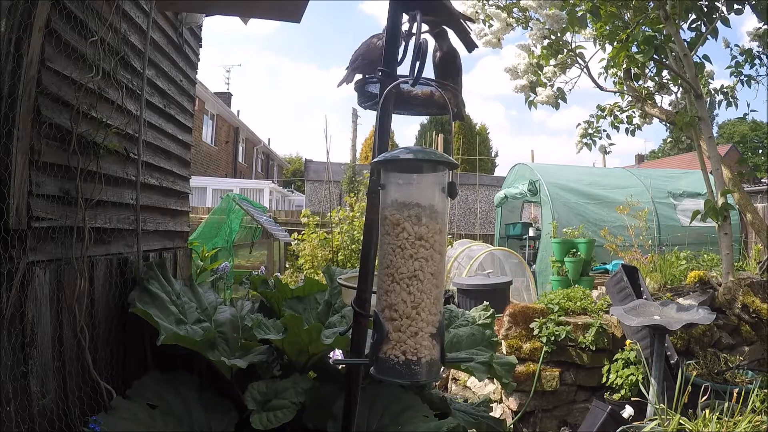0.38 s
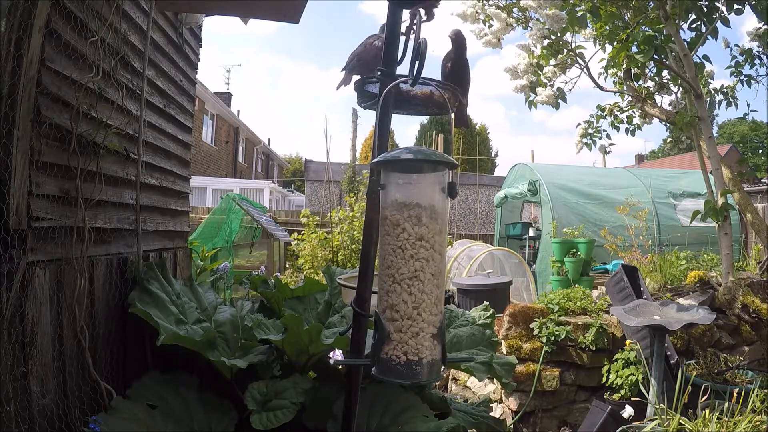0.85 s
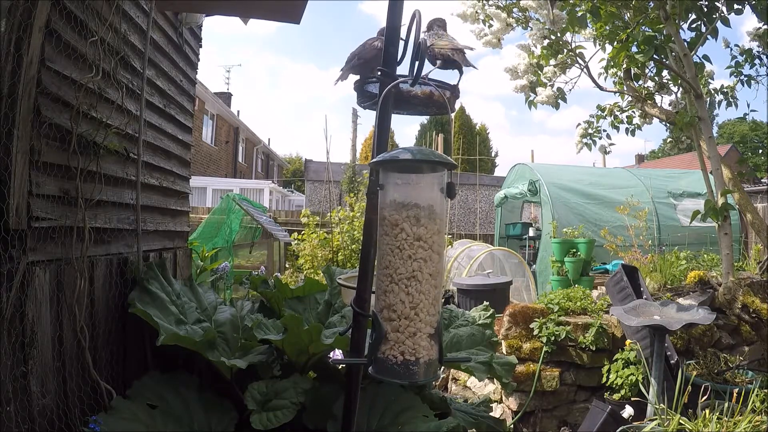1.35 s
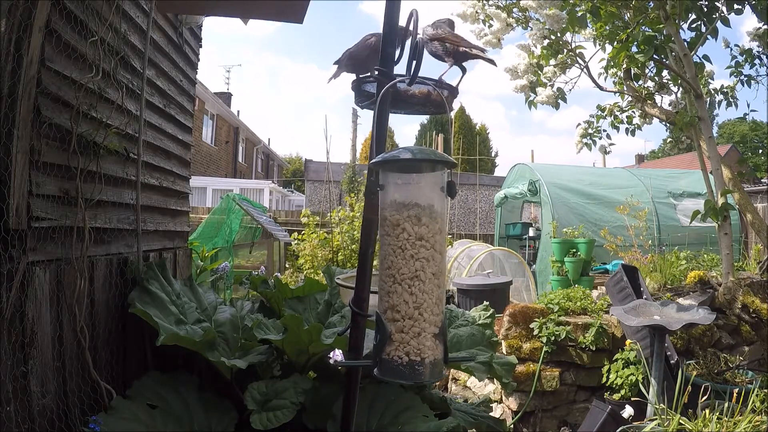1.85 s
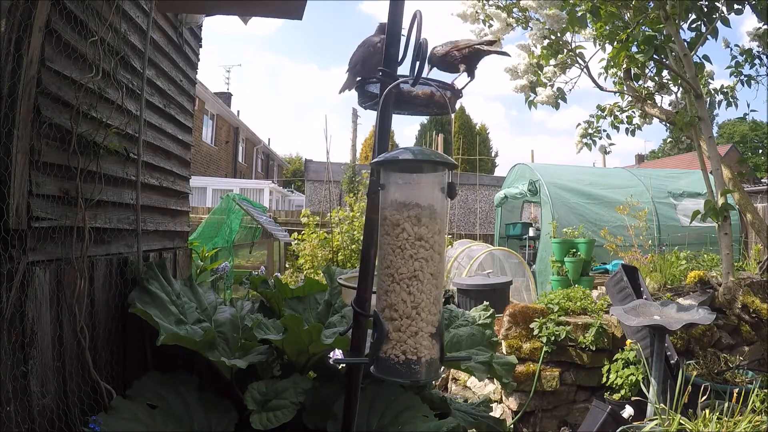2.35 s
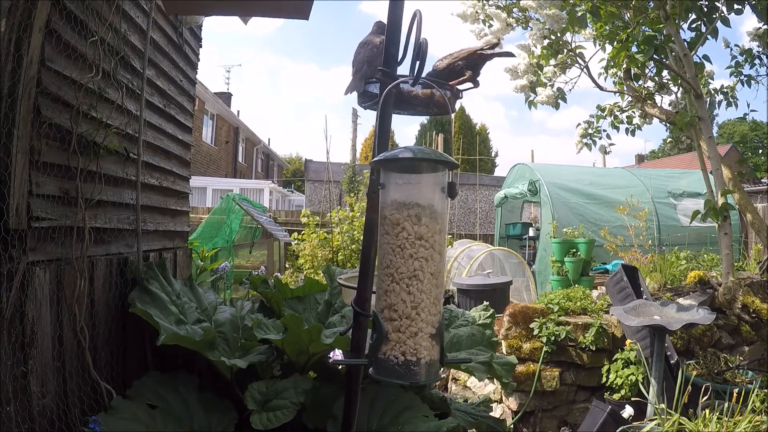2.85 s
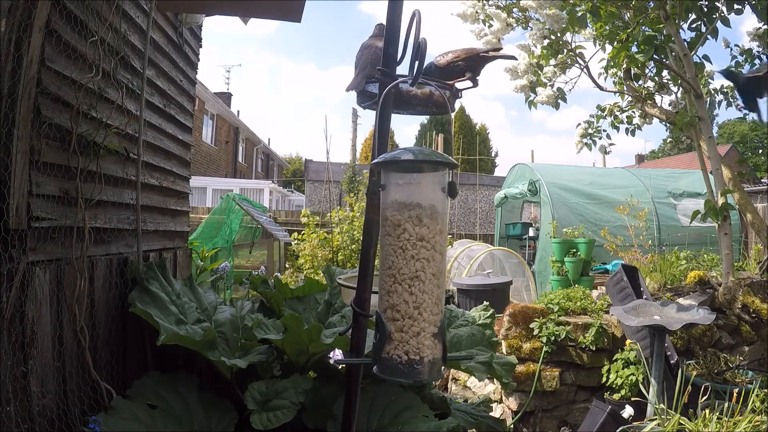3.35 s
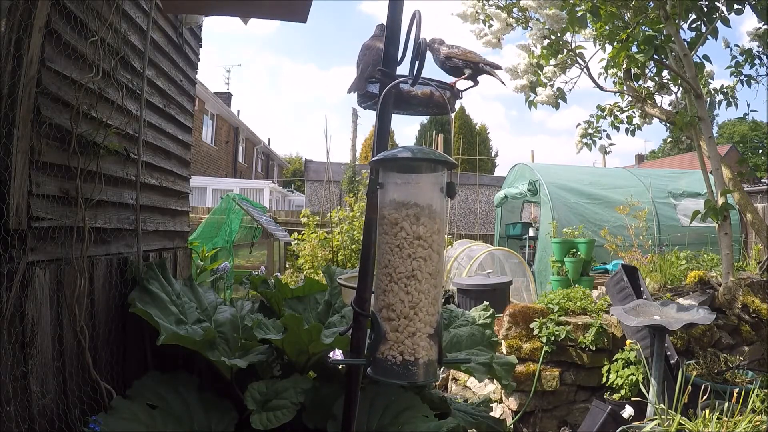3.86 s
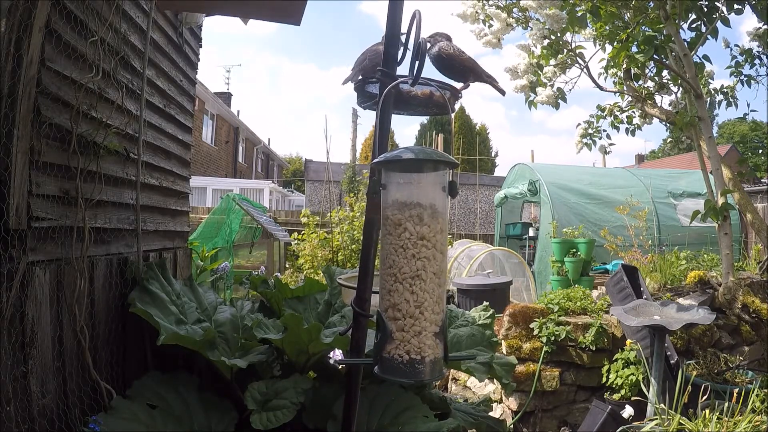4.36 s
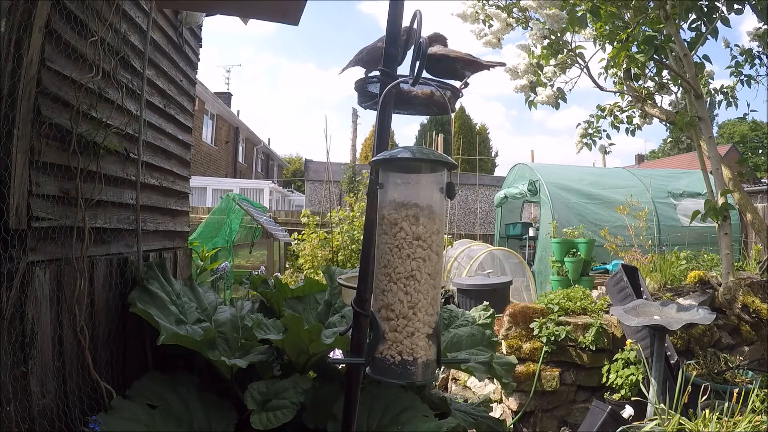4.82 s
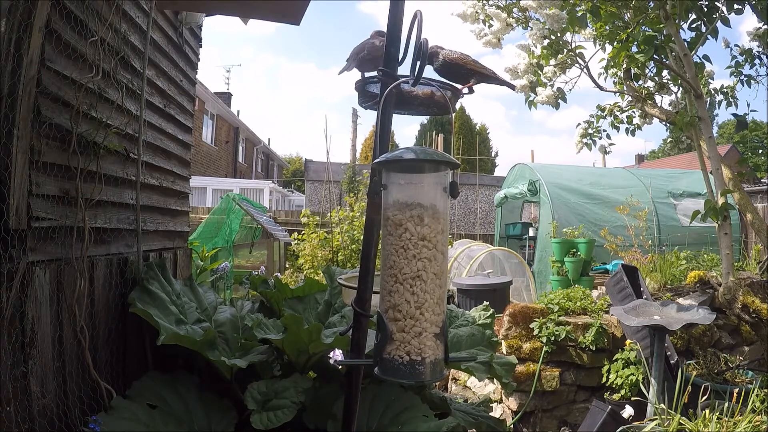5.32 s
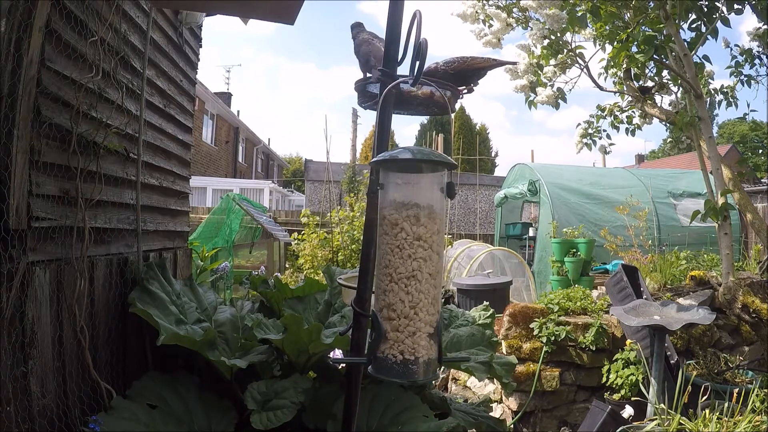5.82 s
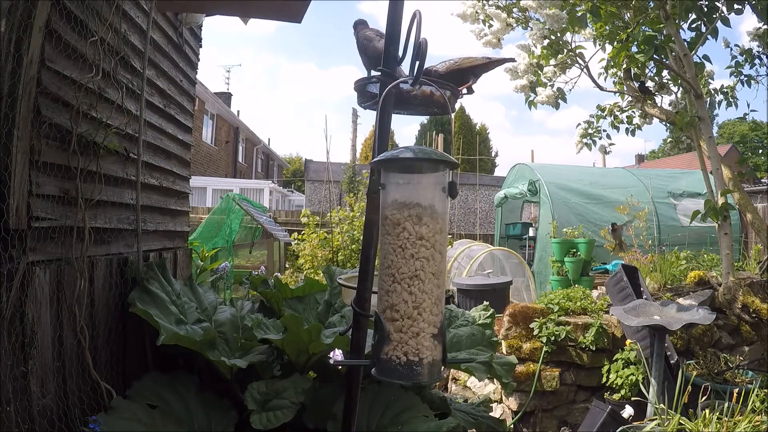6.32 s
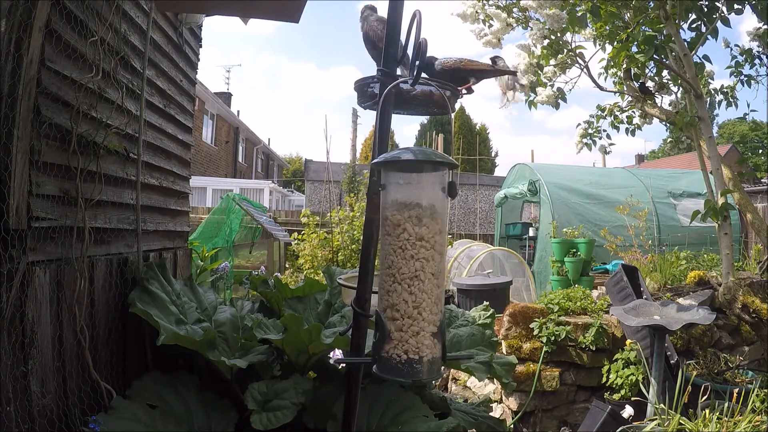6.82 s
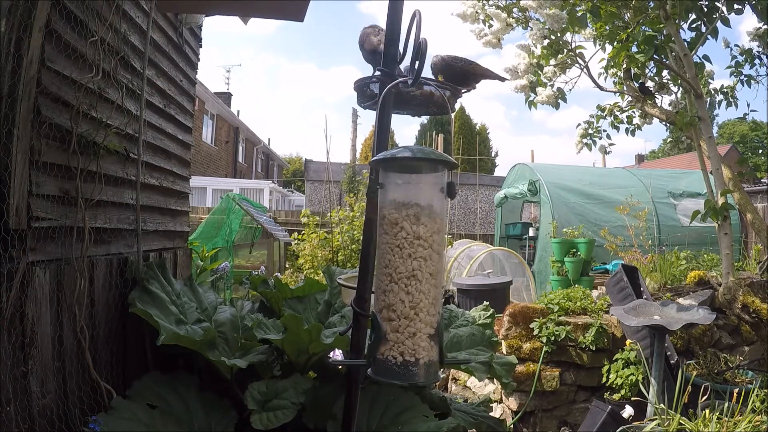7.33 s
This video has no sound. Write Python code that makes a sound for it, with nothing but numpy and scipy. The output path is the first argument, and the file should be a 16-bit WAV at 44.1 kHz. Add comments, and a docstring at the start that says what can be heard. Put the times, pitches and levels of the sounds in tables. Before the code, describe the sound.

A garden feeder heard close, with short dry reflections from shed and fence. A young starling's harsh begging churr, a fast rattling trill trembling about seventy times a second, is already sounding and stops at 0.4 s; another runs 0.9-1.5 s. Faint chirps come near 0.5 s and a tiny claw tick at 0.6. From 1.6 to 2.6 s short scratchy squawks tumble out rapidly, torn and bright. After a gap with a tick near 2.9, more squawks run 3.1-3.8 s, with soft wing flutter from 3.3 to about 3.9. Longer squawks at 4.0, 4.2 and 4.5 overlap a churr until 4.6. Then it is calmer: distant small-bird chirps around 5, 5.7, 6.5 and 7.1, two weak squawks and a very faint low coo just after 6. A last churr swells from 7.2 to the end. Wind rumbles low, bumping strongest around 2 and 3.7 s, over faint hush, slight drone and a barely audible high whine.

```python
"""A garden feeder beside a wooden shed, where young starlings beg in throbbing churrs and harsh squawks.
Churrs pair two trembling voices; squawks are torn pulses and air puffs ringing through throat and beak.
Small birds chirp and a low note coos further off as fluttering sines; claws tick as ringing clicks.
Wings puff shaped noise as a bird lands. Filtered noise makes the wind rumble on the microphone, a low drone
and the neighbourhood hush; the camera electronics whine faintly as a steady sine."""
import sys
import numpy as np
from scipy import signal
from scipy.fft import rfft, irfft
from scipy.io import wavfile

SR = 44100
rng = np.random.default_rng(int(sys.argv[2]) if len(sys.argv) > 2 else 0)


def linear_from_db(decibels):
    """Turn decibels (scalar or array-like) into linear amplitude factors; 0 gives 1."""
    return 10 ** (np.asarray(decibels, float) / 20)


def put_to_file(sound):
    """Save the sound as 16-bit audio at rate SR, in the file named by the first command-line argument."""
    columns = np.atleast_2d(sound).T  # one column per channel
    safe = np.clip(columns, -1, 1)
    whole_steps = np.round(safe * 32767)
    wavfile.write(sys.argv[1], SR, whole_steps.astype(np.int16))


N = 328104  # samples

# Source levels are set ahead of the yard's echoes; spectra give relative gains.
# wind gusts over time: time_s, level_db (a random flutter rides on it)
WIND_GUSTS = [(0.0, -54), (0.04, -48.5), (0.41, -55.5), (0.66, -49.5), (0.87, -51.5), (1.66, -46.5),
              (1.95, -54), (2.03, -40.5), (2.28, -50), (2.98, -56.5), (3.67, -33.5), (3.69, -38.5),
              (4.54, -55), (6.44, -54), (6.51, -48), (6.8, -57), (6.84, -51.5), (7.44, -57.5)]
# spectrum of the wind rumble: frequency_hz, gain_db
WIND_SPECTRUM = [(7.1, -37), (12, -2), (27, 5), (41, 1.5), (145, -23.5), (303, -31.5), (351, -37.5),
                 (400, -34.5), (520, -38), (880, -120)]
# swells of the low drone: centre_s, added_level_db, half_length_s
DRONE_SWELLS = [(1.92, -57, 0.093), (4.13, -57, 0.073), (5.75, -64, 0.057)]
DRONE_DB = -66.5  # between swells
# spectrum of the neighbourhood hush: frequency_hz, gain_db
HUSH_SPECTRUM = [(88, -33), (150, -3.5), (221, -6), (426, -8.5), (639, -12), (940, -12.5), (1680, -16),
                 (1920, -16), (2080, -14), (8030, -23), (8850, -22.5), (9560, -24.5), (15200, -26)]
HUSH_DB = -62
# camera whine: pitch_hz, level_db
CAMERA_WHINE = [(8629, -77)]

# one breakpoint table a churr: time_s, effort_db (raised by CHURR_LIFT_DB), upper_rest_pitch_hz
CHURR_CURVES = [
    [(0, -43, 3856), (.2, -46, 3644), (.3, -44, 3630), (.33, -43.5, 3426), (.405, -44.5, 3280),
     (.43, -62, 2800)],
    [(.905, -67, 3810), (.93, -50.5, 3800), (1.05, -44.5, 3763), (1.33, -41.5, 3785), (1.36, -44.5, 3655),
     (1.525, -41.5, 3236), (1.545, -50, 3020)],
    [(4.03, -53.5, 3693), (4.22, -41, 3976), (4.31, -41.5, 4097), (4.42, -39, 3785), (4.57, -38.5, 3750),
     (4.6, -53, 3280)],
    [(7.17, -66.5, 3610), (7.24, -65, 3690), (7.33, -54.5, 3690), (7.36, -46.5, 3720), (7.44, -46.5, 3740)],
]
CHURR_LIFT_DB = 6.0
# tremor of each churr: start_phase_turns, settled_rate_hz, extra_throbs (gained in the hurried start)
CHURR_THROBS = [(.56, 66, .3), (.74, 66, 2.04), (.51, 71.2, .5), (.83, 70.5, 1.72)]
HURRY_S = .17  # time constant of the hurried start
# lower voice of each churr: rest_pitch_hz, top_pitch_hz, swell_at_top_db
LOWER_VOICES = [(2100, 2780, -1), (2105, 2680, 7), (2124, 2750, 4), (2020, 3000, -5)]
# balance of each churr at its start: upper_top_over_rest_db, its_fade_db_per_s,
# lower_over_upper_db, its_fade_db_per_s, breath_db (held between -14 and -7)
CHURR_BALANCES = [(8, 19, 1.5, 8, -11.5), (10, 18.5, 0.5, 9.5, -7), (17, 16, 5, 18.5, -5),
                  (4.5, 4, 6.5, 26, -14)]
# partials, mixed ones arising as the voices share one airway: lower_multiple, upper_multiple, level_db
VOICE_PARTIALS = [(1, 0, -6.5), (2, 0, -12.5), (0, 1, 0.5), (0, 2, -15.5), (1, 1, -17)]
# the gape that colours the churrs: frequency_hz, gain_db
GAPE_SPECTRUM = [(1700, -10.5), (2000, 2.5), (3000, 10), (5100, -1), (5450, 0.5), (5800, 8), (6300, 5),
                 (7600, 1), (9000, -1), (11000, -18.5), (15000, -14)]
# the top of the upper voice moves less than its rest pitch
TOP_HZ, REST_HZ, TOP_FOLLOWS = 4992, 3750, 0.49

# notes of far small birds: start_s, shape_name, pitch_factor, level_db
CHIRP_NOTES = [(.434, "arch", 1, -57), (0.481, "arch", 1.03, -57.5), (.565, "fall", 0.99, -55),
               (4.869, "lift", 1.34, -67), (4.918, "arch", 0.99, -58.5), (5.049, "fall", 0.95, -59.5),
               (5.089, "warble", 1.07, -64), (5.63, "lift", 1.07, -72), (5.698, "warble", 0.99, -56.5),
               (6.423, "lift", 0.95, -67), (6.473, "lift", 1.4, -71), (6.521, "arch", 1.01, -60.5),
               (7.026, "lift", 1.12, -70), (7.096, "warble", 0.99, -55)]
# chirp that arches up and falls: time_s, pitch_hz, level_db (pitch and level as relative to its note)
ARCH_SHAPE = [(0, 3300, -3), (.028, 4050, -4), (.042, 3200, 0), (.065, 2950, -12)]
# chirp that dips, rises and dips again: same columns, time_s, pitch_hz, level_db
WARBLE_SHAPE = [(0, 4000, -10), (.013, 3250, 0), (.024, 3200, -12), (.038, 3220, 2), (.052, 3900, -5),
                (.066, 3250, -1), (.085, 3200, -12)]
# chirp that mostly falls: same columns, time_s, pitch_hz, level_db
FALL_SHAPE = [(0, 4700, -12), (.025, 5080, -2), (.045, 4500, -3), (.062, 3400, 0), (.075, 3000, -14)]
# chirp that rises: same columns, time_s, pitch_hz, level_db
LIFT_SHAPE = [(0, 2990, 4), (.025, 3280, 2), (.045, 3500, -14)]
CHIRP_SHAPES = dict(arch=ARCH_SHAPE, warble=WARBLE_SHAPE, fall=FALL_SHAPE, lift=LIFT_SHAPE)

# claws on the feeder: start_s, peak_db, main_ring_hz
CLAW_TICKS = [(0.627, -45.5, 3730), (2.8548, -44.5, 2170), (3.626, -44, 3780), (4.696, -50, 3530),
              (7.156, -61, 3250)]

# squawks: start_s, length_s, loudest_at_share (0-1), effort_db, starting_pitch_hz,
# treble_db (beak over throat, before it opens or shuts), mouth_ring_hz
SQUAWK_CALLS = [(1.64, .068, 0.4, -27, 1433, -5.5, 5080), (1.712, 0.053, 0.34, -30, 1288, 0, 5300),
                (1.802, .058, 0.46, -28, 1456, -1, 4880), (1.88, 0.054, 0.44, -32.5, 989, 0.5, 4850),
                (1.967, 0.066, 0.42, -29.5, 1481, 0, 5960), (2.051, 0.065, 0.5, -37, 1023, 3, 5000),
                (2.151, 0.088, 0.48, -34.5, 1480, -4, 4820), (2.248, 0.075, 0.23, -40, 959, -2.5, 4550),
                (2.435, 0.13, 0.34, -34, 1384, -4, 4750), (3.084, 0.12, 0.31, -31.5, 1430, -3.5, 5440),
                (3.229, 0.071, .45, -31.5, 1450, 1.5, 5200), (3.318, 0.061, 0.37, -35.5, 995, 6.5, 4970),
                (3.408, 0.082, 0.38, -30.5, 1377, 2, 5050), (3.504, 0.0514, 0.47, -31.5, 996, 1, 4720),
                (3.659, 0.13, 0.25, -28.5, 1191, -6, 5370), (4.015, 0.12, 0.34, -31.5, 1453, -8, 5200),
                (4.231, 0.12, 0.22, -33, 1372, -2.5, 5640), (4.462, 0.12, 0.26, -35.5, 1417, -1, 5100),
                (5.997, 0.096, 0.19, -51.5, 981, -7, 6100), (6.083, 0.063, 0.2, -53.5, 904, -11, 5170)]
# throat filter: frequency_hz, gain_db
THROAT_SPECTRUM = [(880, -71), (1500, -32.5), (1820, -34.5), (2410, -9.5), (2800, -21.5), (3170, 1),
                   (4100, -13), (5330, -18), (9020, -120)]
# beak filter: frequency_hz, gain_db
BEAK_SPECTRUM = [(2410, -28), (4100, -38), (4530, 8), (4780, 3.5), (5450, -6), (5920, 6), (7830, -5.5),
                 (9750, -6), (10800, -20.5), (12500, -9), (13100, -15), (15200, -37)]
# gain of the beak's top treble, read once at each squawk's start: time_s, gain_db
SHEEN_GAINS = [(1.6, 2), (2.0, -4), (2.5, -3), (3.1, 1.5), (3.8, -7), (4.6, -9)]
# where that gain starts and is full: start_hz, full_hz
SHEEN_RANGE = 9300, 11700
# a tighter squawk rings higher in the throat, is noisier and has a weaker first partial
MID_HZ, THROAT_HZ, THROAT_FOLLOWS = 1235, 2707, 1.14
FIRST_DB, FIRST_DB_PER_KHZ, FIRST_END_DB = -16.5, -11, -8  # first partial, relative to effort
ROUGH, ROUGH_PER_KHZ = .56, .25  # roughness at MID_HZ and its growth with pitch
# pitch scoops up at the start, then slides towards the slack pitch
SCOOP, SCOOP_S, SLACK_HZ, SLACKEN_S = 0.0618, 0.01003, 943.4, .16  # share, s, Hz, s
GAPING_DB, SHUT_DB = 0.5, -8  # change of treble at the start and, as the beak shuts, at the end
ONSET_DB, END_DB, HUMP_POWER = -12.5, -6.5, 1.3  # effort at both ends, shape of the hump

# a bird flutters in to land
FLAP_START_S, FLAPS, FLAP_RATE_HZ = 3.292, 9, 15.5
FLAP_LOUDEST_S, FLAP_DB, FLAP_FADE_DB_PER_S = 3.45, -46.5, 20
FLAP_RISE_S, FLAP_T60_S = 0.0052, 0.16
# spectrum of the wing puffs: frequency_hz, gain_db
WING_SPECTRUM = [(60, -12), (130, -6), (300, -20), (700, -11), (1500, -5), (4000, -17), (9000, -45)]

# a far low note: time_s, pitch_hz, level_db
COO_CURVE = [(6.0, 958, -81), (6.21, 920, -65), (6.3, 890, -72)]

# echoes off shed wall, ground and fence: delay_s, level_db
CLOSE_ECHOES = [(.005, -10.5), (.0083, -13.5), (.013, -12)]
YARD_T60_S, YARD_TAIL_DB, FAR_TAIL_DB = .3, -14, -5
STIR_HZ = 9  # moving leaves keep changing the tail


def evened(x):
    """Scales to rms 1."""
    return x / np.sqrt(np.mean(x ** 2) + 1e-20)


def add(mix, start_s, sound):
    """Mixes a sound in at its start time."""
    part = mix[round(start_s * SR):][:len(sound)]
    part += sound[:len(part)]


def curves(rows):
    """Time axis and each column joined by straight lines."""
    s, *columns = np.transpose(rows)
    t = np.arange(s[0], s[-1], 1 / SR)
    return t, *(np.interp(t, s, column) for column in columns)


def drift(size, hz):
    """Random wander of rms 1: noise smoothed by two equal poles at about hz."""
    pole = np.exp(-2 * np.pi * hz / SR)
    noise = rng.standard_normal(size + 4000)
    return evened(signal.lfilter([1], np.poly([pole, pole]), noise)[4000:])  # skips the filter's start


def colour(x, points):
    """Filters by a spectrum, joined over log frequency, and scales to rms 1."""
    f, db = np.transpose(points)
    hz = np.fft.rfftfreq(len(x), 1 / SR)
    gain = linear_from_db(np.interp(np.log(hz + 1), np.log(f + 1), db))
    return evened(irfft(rfft(x) * gain, len(x)))


def coloured(points):
    """Steady noise shaped by the given spectrum, rms 1."""
    return colour(rng.standard_normal(N), points)


def resonate(x, hz, width_hz):
    """A fixed or moving resonance: shifted down to 0 Hz, smoothed and shifted back."""
    turn = np.exp(2j * np.pi * np.cumsum(hz * np.ones(len(x))) / SR)
    r = np.exp(-np.pi * width_hz / SR)
    return 2 * (turn * signal.lfilter([1 - r], [1, -r], x / turn)).real


def tone(hz):
    """A sine of rms 1 that follows a pitch curve."""
    return np.sqrt(2) * np.sin(2 * np.pi * np.cumsum(hz) / SR)


def edged(sound, rise_s, fall_s):
    """Fades both ends in straight lines."""
    t = np.arange(len(sound)) / SR
    return sound * np.minimum(1, np.minimum(t / rise_s, t[::-1] / fall_s))


def wind():
    """Gusts rumble on the microphone: low noise with a lumpy level."""
    gust_db = np.interp(np.arange(N) / SR, *np.transpose(WIND_GUSTS))
    return coloured(WIND_SPECTRUM) * linear_from_db(gust_db + 2.74 * drift(N, 6.7))


def drone():
    """Noise through two narrow low resonances hums and swells now and then."""
    t = np.arange(N) / SR
    level = linear_from_db(DRONE_DB)
    for centre_s, db, half_length_s in DRONE_SWELLS:
        level = level + linear_from_db(db) * np.exp(-((t - centre_s) / half_length_s) ** 2)
    hum = resonate(resonate(rng.standard_normal(N), 115, 43), 115, 43)
    return level * evened(hum)


def hush():
    """The neighbourhood: distant shaped noise, barely wavering in level."""
    return coloured(HUSH_SPECTRUM) * linear_from_db(HUSH_DB + 0.52 * drift(N, 3.5))


def camera_whine():
    """The camera electronics sing a steady sine."""
    return sum(linear_from_db(db) * tone(np.full(N, hz)) for hz, db in CAMERA_WHINE)


def flick(cycle, dwell, sharp):
    """0 at rest, 1 at the top of each throb; dwell lengthens the rest."""
    lift = np.tanh(sharp * (np.cos(cycle) - dwell))
    return (lift - lift.min()) / np.ptp(lift)


def churr(rows, throbs, low, balance):
    """Both sides of the syrinx sing; a muscle tremor flicks both pitches up some 70 times a second."""
    t, effort_db, rest_hz = curves(rows)
    size, age = len(t), t - t[0]
    phase, rate_hz, extra_throbs = throbs
    low_rest_hz, low_top_hz, low_swell_db = low
    top_db, top_fade, lower_db, lower_fade, breath_db = balance

    count = phase + rate_hz * age + extra_throbs * (1 - np.exp(-age / HURRY_S))
    cycle = 2 * np.pi * (count + .01 * drift(size, 40))
    upper_lift = flick(cycle + .3, .35, 1.75)
    lower_lift = flick(cycle + .8, .4, 1.3)

    top_hz = TOP_HZ + TOP_FOLLOWS * (rest_hz - REST_HZ)
    upper_hz = (rest_hz + (top_hz - rest_hz) * upper_lift) * (1 + .012 * drift(size, 300))
    lower_hz = (low_rest_hz + (low_top_hz - low_rest_hz) * lower_lift) * (1 + .028 * drift(size, 400))

    # both voices fade while they jump
    upper_speed = abs(np.gradient(upper_lift))
    lower_speed = abs(np.gradient(lower_lift))
    upper_db = (top_db - top_fade * age) * upper_lift - 7.0 * upper_speed / upper_speed.max()
    upper_db = upper_db + 2.0 * drift(size, 150)
    lower_db = lower_db - lower_fade * age - 1.0 * lower_speed / lower_speed.max()
    lower_db = lower_db + low_swell_db * lower_lift + 2.0 * drift(size, 150)

    voices = np.zeros(size)
    for a, b, db in VOICE_PARTIALS:
        level = linear_from_db(db + lower_db * (a > 0) + upper_db * (b > 0))
        voices += level * tone(a * lower_hz + b * upper_hz)
    breath = linear_from_db(np.clip(breath_db, -14, -7)) * rng.standard_normal(size)
    sound = linear_from_db(effort_db + CHURR_LIFT_DB) * colour(voices + breath, GAPE_SPECTRUM)
    return t[0], edged(sound, 0.00067, 0.0076)


def whistle(rows, flutter):
    """A near sine whose level and pitch flutter by a share 0-1."""
    t, hz, db = curves(rows)
    pitch_hz = hz * (1 + .03 * flutter * drift(len(t), 300))
    level = linear_from_db(db + 5.7 * flutter * drift(len(t), 100))
    return t[0], edged(level * tone(pitch_hz), 0.0025, 0.0023)


def chirp(start_s, shape, pitch_factor, db):
    """One note of a small bird: a fluttering whistle drawn from its shape."""
    rows = [(start_s + after, pitch_factor * hz, db + swell_db)
            for after, hz, swell_db in CHIRP_SHAPES[shape]]
    return whistle(rows, .6)


def tick(start_s, peak_db, ring_hz):
    """A claw on the feeder: a decaying noise click excites a short dull ring."""
    t = np.arange(2000) / SR
    knock = rng.standard_normal(len(t)) * linear_from_db(-60 * t / 0.07)
    sound = resonate(knock, ring_hz, 570) * 9.8 + 0.12 * resonate(knock, 4000, 4200)
    return start_s, linear_from_db(peak_db) * sound / abs(sound).max()


def squawk(start_s, length_s, share, effort_db, pitch_hz, treble_db, mouth_hz):
    """One side of the syrinx pulses, the other beats near half its pitch and tears it; air puffs join in."""
    t = np.arange(0, length_s, 1 / SR)
    size = len(t)
    # how far before or after the loudest moment: 1 at the ends, 0 at the loudest
    before = np.maximum(1 - t / length_s / share, 0)
    after = np.maximum(t / length_s - share, 0) / (1 - share)
    effort_db = effort_db + ONSET_DB * before ** HUMP_POWER + END_DB * after ** HUMP_POWER
    beak_db = treble_db + GAPING_DB * before + SHUT_DB * after

    hz = SLACK_HZ + (pitch_hz - SLACK_HZ) * np.exp(-t / SLACKEN_S)
    hz = hz * (1 - SCOOP * np.exp(-t / SCOOP_S))
    hz = hz * (1 + .025 * drift(size, 25))  # the pitch bends unsteadily
    tight_hz = pitch_hz - MID_HZ
    throat_hz = THROAT_HZ + THROAT_FOLLOWS * tight_hz
    rough = ROUGH + ROUGH_PER_KHZ * tight_hz / 1000
    first_db = effort_db + FIRST_DB + FIRST_DB_PER_KHZ * tight_hz / 1000 + FIRST_END_DB * (before + after)

    turns = np.cumsum(hz * (1 + .045 * rough * drift(size, 120))) / SR
    beat = np.cumsum(hz * (.5 + .16 * rough ** 2 * drift(size, 40))) / SR
    pulses = sum(np.cos(2 * np.pi * k * turns + .4 * k ** 2) for k in range(1, 14))
    pulses = pulses * (1 + 1.18 * np.cos(2 * np.pi * beat))
    puff_level = 0.19 + np.exp(-(turns / 2 % 1) / 1.8)  # one puff every two pulses
    puffs = puff_level * rng.standard_normal(size)
    drive = (1 - rough) * evened(pulses) + rough ** 1.5 * evened(puffs)
    drive = drive * linear_from_db(2.1 * drift(size, 165))  # the folds catch and slip

    # throat and mouth rings slide as neck and beak move
    rings = []
    for ring_hz in (throat_hz, mouth_hz):
        moving_hz = ring_hz * (1 + 0.086 * drift(size, 45))
        rings.append(evened(resonate(resonate(drive, moving_hz, 470), ring_hz, 1670)))
    throat = evened(colour(drive, THROAT_SPECTRUM) + 0.69 * rings[0])
    beak = evened(colour(drive, BEAK_SPECTRUM) + 1.03 * rings[1])
    sheen_db = np.interp(start_s, *np.transpose(SHEEN_GAINS))
    beak = colour(beak, [(SHEEN_RANGE[0], 0), (SHEEN_RANGE[1], sheen_db)])
    first = linear_from_db(first_db + 3.0 * drift(size, 100)) * np.cos(2 * np.pi * turns)
    return start_s, edged(linear_from_db(effort_db) * (throat + linear_from_db(beak_db) * beak) + first, .006, .012)


def wings():
    """Each downstroke pushes a soft puff of air: noise that rises fast and dies away."""
    beats = FLAP_START_S + np.arange(FLAPS) / FLAP_RATE_HZ + .003 * rng.standard_normal(FLAPS)
    age = np.maximum(np.arange(N) / SR - beats[:, None], 0)
    decay = linear_from_db(np.maximum(-60 * age / FLAP_T60_S, -200))
    strokes = np.minimum(age / FLAP_RISE_S, 1) * decay
    levels = linear_from_db(FLAP_DB - FLAP_FADE_DB_PER_S * abs(beats - FLAP_LOUDEST_S))
    return coloured(WING_SPECTRUM) * (levels @ strokes)


def coo():
    """A far low note: a whistle with little flutter."""
    return whistle(COO_CURVE, 0.18)


def yard(x, tail_db):
    """A few strong echoes, then sparse taps that die away; two sets of taps take turns."""
    size = SR // 2
    early, tails = np.zeros(size), np.zeros((2, size))
    early[0] = 1  # direct sound
    for delay_s, db in CLOSE_ECHOES:
        early[round(delay_s * SR)] += linear_from_db(db)

    # one tap of random sign in every 20 samples
    at = np.arange(300, size - 20, 20) + rng.integers(0, 20, (2, (size - 301) // 20))
    taps = rng.choice([-1., 1.], at.shape) * linear_from_db(-60 * at / SR / YARD_T60_S)
    np.put_along_axis(tails, at, taps, 1)
    tails = linear_from_db(tail_db) * tails / np.linalg.norm(tails[0])

    turn = 2 * np.pi * STIR_HZ * np.arange(N) / SR
    feeds = x * np.array([np.sin(turn), np.cos(turn)])
    late = signal.oaconvolve(feeds, tails, axes=1).sum(0)
    return (signal.oaconvolve(x, early) + late)[:N] / np.linalg.norm(early + tails[0])


def scene():
    """Near birds get the close echoes; far birds get them twice over; the background gets none."""
    background = wind() + drone() + hush() + camera_whine()
    near, far = np.zeros((2, N))
    for call in zip(CHURR_CURVES, CHURR_THROBS, LOWER_VOICES, CHURR_BALANCES):
        add(near, *churr(*call))
    for row in CHIRP_NOTES:
        add(far, *chirp(*row))
    for row in CLAW_TICKS:
        add(near, *tick(*row))
    for row in SQUAWK_CALLS:
        add(near, *squawk(*row))
    near += wings()
    add(far, *coo())
    garden = yard(near + yard(far, FAR_TAIL_DB), YARD_TAIL_DB)
    return (garden + background)[None]


def roll_off(x):
    """The treble ends steeply here."""
    return signal.sosfilt(signal.butter(12, 15350, fs=SR, output="sos"), x)


def record(dry):
    """Takes the finished mix to its final form."""
    return roll_off(dry)


dry = scene()
out = record(dry)
put_to_file(out)
```